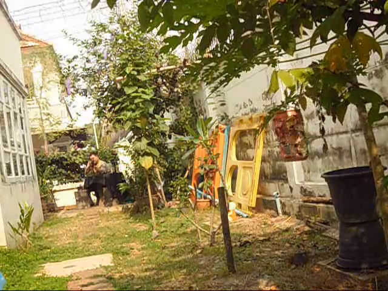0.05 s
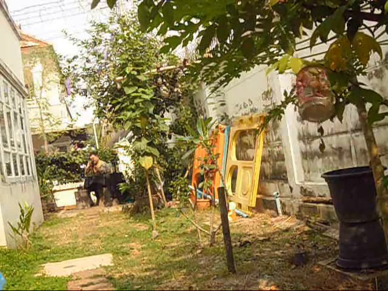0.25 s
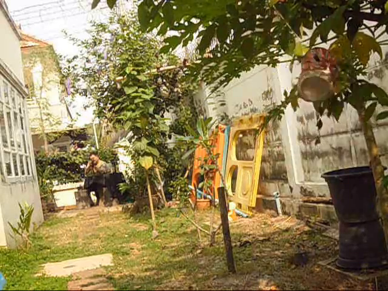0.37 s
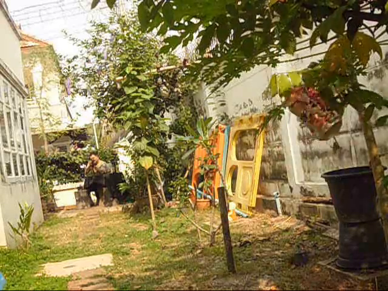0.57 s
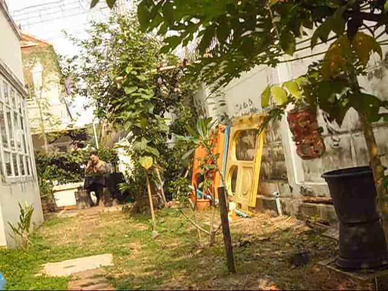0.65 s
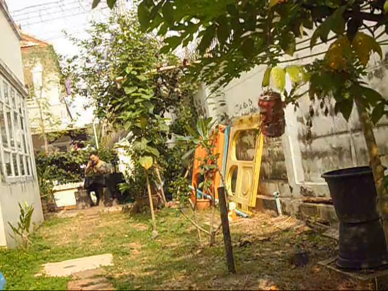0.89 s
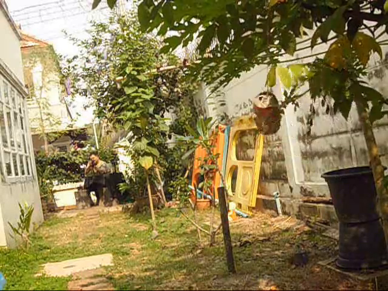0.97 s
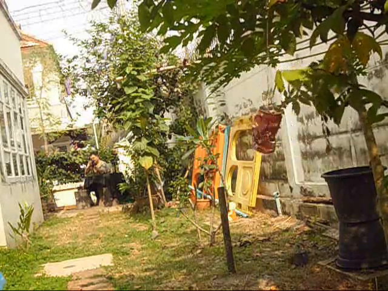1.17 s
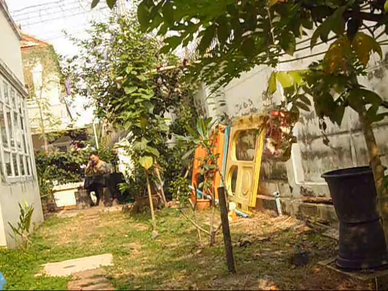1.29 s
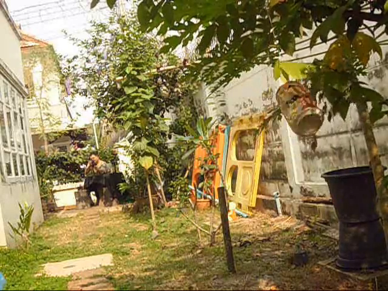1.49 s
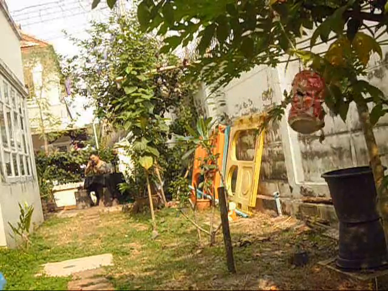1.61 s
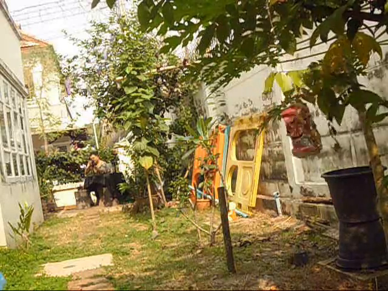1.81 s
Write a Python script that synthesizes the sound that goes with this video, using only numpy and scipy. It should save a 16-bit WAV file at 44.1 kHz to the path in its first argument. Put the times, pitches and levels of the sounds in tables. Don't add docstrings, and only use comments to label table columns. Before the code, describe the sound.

Loud tinny smack of a pellet on a hanging can after an airgun crack, then fading rattles.

```python
import sys
import numpy as np
from scipy import signal
from scipy.fft import rfft, irfft
from scipy.io import wavfile
from scipy.ndimage import uniform_filter1d

SR = 44100
rng = np.random.default_rng(int(sys.argv[2]) if len(sys.argv) > 2 else 0)


def voltage_ratio(decibels):
    exponent = np.asarray(decibels, float) / 20
    return 10 ** exponent


def persist_wave(psi):
    counts = np.round(np.clip(psi, -1, 1) * 32767).astype(np.int16)
    wavfile.write(sys.argv[1], SR, np.atleast_2d(counts).T)


N = 81585
SHOT_S, HIT_S = .2164, .262

# f/Hz, level/dB [dB per Hz]
CRUMPLE_SPECTRUM = [(35, -55), (60, -17.5), (1060, -6), (1190, -2), (1440, -9.5), (4410, 0.5), (7900, -8),
                    (12000, -8.5), (15900, -28)]
# f/Hz, level/dB [dB per Hz]
THUMP_SPECTRUM = [(15, -39), (25, 3), (258, 7.5), (788, 1), (1050, -1.5), (1200, -6.5), (1560, -18),
                  (2640, -120)]
# f/Hz, level/dB, t60/s
CAN_MODES = [(1560, -15, 0.37), (1606, -3, 0.23), (2234, -10.5, 0.4), (2950, -7, 0.23), (2900, -6, .2),
             (3190, -7.5, .2), (3725, 4.5, 0.75), (3680, -2.5, .2), (4130, -2, 0.3), (4310, -2.5, 0.099),
             (5290, -4.5, 0.076), (5390, -2.5, 0.12), (5900, -2.5, 0.22), (8800, -9, .2)]


def hit():
    t = np.arange(SR // 2) / SR
    hold_s, crumple_t60, snap_db = 0.016, 0.14, 1.4
    fall = voltage_ratio(-60 * np.maximum(t - hold_s, 0) / crumple_t60)
    flutter = evened(uniform_filter1d(rng.standard_normal(len(t)), size=60))
    snaps = evened(voltage_ratio(snap_db * flutter))
    crumple = voltage_ratio(-1.93) * noise(CRUMPLE_SPECTRUM, len(t)) * snaps * fall
    tones = voltage_ratio(-11.5) * ring(*np.transpose(CAN_MODES), size=len(t))
    push_db, push_s = -14, 0.0084
    phase = t / push_s
    push = voltage_ratio(push_db) * phase * (2 - phase) * np.exp(-phase)
    thump_db, thump_t60 = -10.5, .05
    thump = voltage_ratio(thump_db - 60 * t / thump_t60) * noise(THUMP_SPECTRUM, len(t))
    return crumple + tones + push + thump


def ring(hz, db, t60, size):
    longest_t60 = .3
    weights = voltage_ratio(db) / np.linalg.norm(voltage_ratio(db))
    return modes(hz, np.clip(t60, .01, longest_t60), size) @ weights


def modes(hz, t60, size):
    contact_s = 0.00029
    t = np.arange(size)[:, None] / SR
    sines = np.sin(2 * np.pi * (hz * t + rng.random(len(hz))))
    return voltage_ratio(-60 * t / t60) * sines * np.minimum(t / contact_s, 1)


# t/s, wall level/dB, rim
# level/dB, base level/dB, skid/s
KNOCKS = [(.323, -24, -26.5, -26, 0.008), (.345, -44, -19.5, -26, 0.008),
          (.375, -28, -25.5, -30, 0.0074), (.488, -33.5, -27.5, -40, 0.0061),
          (0.549, -36, -29, -31, 0.0016), (.5687, -30, -36, -40.5, 0.004), (.585, -48, -40, -51, 0.013),
          (0.605, -39.5, -39, -40, 0.0027), (.627, -62, -35, -45.5, 0.006),
          (.637, -43, -37.5, -44, 0.0011), (0.699, -50, -45.5, -59, 0.0012),
          (0.7662, -60, -50.5, -60, 0.0077),
          (0.7902, -50, -40.5, -47, 0.0045), (0.8084, -46, -37, -31.5, 0.0042),
                (0.8109, -58, -50, -38, 0.0012), (0.831, -63, -37.5, -45, 0.006),
                (0.8417, -55, -34, -38.5, 0.0052), (0.8649, -65, -29, -37, 0.003),
                (0.872, -46.5, -39.5, -47.5, 0.0025), (.878, -48, -32, -38.5, 0.0087),
                (0.9429, -56.5, -33.5, -32, 0.006), (.962, -56, -52, -54, 0.0022),
                (1.0496, -60, -49, -44, 0.0006), (1.0541, -59.5, -40.5, -44, 0.00044),
                (1.08, -46, -52, -50, 0.035), (1.2179, -60, -50.5, -64, 0.00075),
                (1.3028, -61, -45, -33, 0.00059), (1.308, -57, -51.5, -37, 0.002),
                (1.313, -60, -46.5, -42, 0.00067), (1.3236, -55, -45, -37.5, 0.0024),
                (1.355, -67, -56, -48, 0.0046), (1.338, -59, -44, -48, 0.005),
                (1.3925, -56, -45.5, -57, 0.013), (1.4421, -52, -41, -41.5, 0.0077),
                (1.4664, -49.5, -44.5, -37.5, 0.006), (1.478, -61, -43.5, -38, 0.0013),
                (1.4869, -65, -50, -43.5, 0.0011), (1.4934, -58, -50, -30.5, 0.0006),
                (1.4958, -61, -50, -33, .003), (1.516, -71, -58, -57, 0.0036),
                (1.752, -66.5, -64.5, -67, .003), (1.7869, -56, -47.5, -33, 0.0022),
                (1.824, -57, -52, -52, 0.014)]
# t/s, level/dB
ROLLING_LEVEL = [(.28, -25), (.36, -20.5), (.42, -20), (.48, -23.5), (.54, -33), (.64, -37.5), (0.679, -53),
                 (0.759, -54), (.82, -39.5), (.9, -37.5), (.995, -43), (1.02, -52), (1.12, -51.5),
                 (1.28, -60.5), (1.44, -45), (1.56, -60.5), (1.68, -70), (1.85, -46.5)]


def pellet():
    banks, out = can_banks(), np.zeros(N)
    for s, *levels_db, skid_s in KNOCKS:
        taps = skid(max(skid_s, .0005))
        response = sum(voltage_ratio(db) * strike(bank) for db, bank in zip(levels_db, banks))
        add(out, s, signal.fftconvolve(taps, response))
    out += rolling(banks)
    low_cut_hz = 390
    return signal.lfilter(*signal.butter(2, low_cut_hz, "high", fs=SR), out)


def rolling(banks):
    hits_per_s, spread_db, damp_s, trim_db = 600, 3, 0.045, -3
    roll = np.zeros(N)
    for spot in range(4):
        size = voltage_ratio(spread_db * np.minimum(rng.exponential(1, N), 4))
        size *= rng.random(N) < hits_per_s / SR
        body = sum(voltage_ratio(db) * strike(bank) for db, bank in zip((-2, 0.2, -2.5), banks))
        damped = body * np.exp(-np.arange(len(body)) / (damp_s * SR))
        roll += signal.oaconvolve(size, damped)[:N]
    s, db = np.transpose(ROLLING_LEVEL)
    return evened(roll) * voltage_ratio(trim_db + np.interp(np.arange(N) / SR, s, db, left=-120))


# f/Hz, level/dB, t60/s
WALL_MODES = [(1455, -9.5, .15), (1699, -0.5, 0.16), (2070, -7, 0.22), (2224, -0.5, 0.05), (1940, -3, 0.2),
              (2100, -6, 0.047), (2230, 1, 0.082), (2300, -10.5, 0.033)]
# f/Hz, level/dB, t60/s
RIM_MODES = [(780, -21.5, .3), (1039, -11, .2), (1130, -24.5, 0.11), (1525, -6.5, 0.077),
             (1950, -7.5, 0.068), (2340, -15.5, 0.033), (3130, -5, 0.083), (3730, 3.5, 0.11),
             (3890, -1, 0.078), (4016, -3.5, 0.11), (4290, -2, 0.15), (5280, -9, 0.3)]
# f/Hz, level/dB, t60/s
BASE_MODES = [(5600, -8.5, 0.066), (5596, -1, 0.087), (6100, -10, 0.14), (6170, -9.5, 0.17),
              (6650, -9, 0.13), (7480, -12.5, 0.038), (8730, -10, 0.043), (10100, -8, 0.066),
              (10690, -5.5, 0.079), (11900, -16, .1)]
# f/Hz, level/dB [dB per Hz]
WALL_CROWD = [(180, -59), (300, -29.5), (1150, -18.5), (1240, -14), (2040, -4), (4000, -9), (5200, -43),
              (8800, -120)]
# f/Hz, level/dB [dB per Hz]
RIM_CROWD = [(180, -51), (300, -12), (1270, -22), (1430, 1), (1660, -15), (4280, -2), (15900, -12.5)]
# f/Hz, level/dB [dB per Hz]
BASE_CROWD = [(590, -49.5), (1000, -12), (2870, -15), (3700, -6), (4560, -7.5), (5550, 0.5), (15900, -16.5)]
# f/Hz, t60/s
CROWD_T60 = [(500, 0.23), (2000, 0.29), (6000, 0.051), (14000, 0.18)]


def can_banks(count=320, size=6000):
    split, twin_db, longest_t60 = 0.0049, -7, 0.72
    pair = np.array([0, 1])
    banks = []
    for named, crowd, top_hz, crowd_db in [(WALL_MODES, WALL_CROWD, 3500, 1.4),
                                           (RIM_MODES, RIM_CROWD, 16000, 3.6),
                                           (BASE_MODES, BASE_CROWD, 18000, 0)]:
        hz, db, t60 = np.transpose(named + named)
        hz = hz * (1 + split * np.repeat(pair, len(named)))
        db = db + twin_db * np.repeat(pair, len(named))
        close_hz = 300 + (top_hz - 300) * (np.arange(count) + rng.random(count)) / count
        close = voltage_ratio(read(crowd, close_hz))
        close_t60 = read(CROWD_T60, close_hz) * rng.uniform(0.37, 1.05, count)
        all_t60 = np.r_[np.clip(t60, .01, longest_t60), np.maximum(close_t60, .01)]
        bank = modes(np.r_[hz, close_hz], all_t60, size)
        named_share = voltage_ratio(db) / np.linalg.norm(voltage_ratio(db))
        close_share = voltage_ratio(crowd_db) * close / np.linalg.norm(close)
        banks.append(bank * np.r_[named_share, close_share])
    return banks


def strike(bank):
    spot, tick_db, tick_s = 0.85, 6, 0.00099
    count = bank.shape[1]
    share = (1 + spot * rng.uniform(-1.3, 1, count)) * rng.choice([-1., 1.], count)
    tick = 1 + voltage_ratio(tick_db) * np.exp(-np.arange(len(bank)) / (tick_s * SR))
    return (bank @ share) * tick


def skid(skid_s, size=2048):
    taps_per_s, skid_db = 4200, -4
    t = np.arange(size) / SR
    taps = rng.standard_normal(size) * (rng.random(size) < taps_per_s / SR)
    taps *= voltage_ratio(skid_db) * np.exp(-t / skid_s) * np.sqrt(0.0049 / skid_s)
    taps[0] = min(0.0024 / skid_s, 1)
    z = rfft(taps)
    smooth_power = uniform_filter1d(abs(z) ** 2, size=size // 64)
    flat = irfft(z / np.sqrt(smooth_power), size)
    return flat[:size * 7 // 8]


# t/s, f/Hz, peak level/dB, t60/s
FAVOURED_MODES = [(.323, 1610, -24.5, 0.13), (0.342, 4310, -16, 0.05), (.374, 2234, -20.5, 0.2),
                  (0.4906, 1753, -25.5, 0.23), (0.493, 4080, -22, 0.063), (.492, 5070, -28.5, 0.092),
                  (.5488, 2066, -15.5, 0.043), (.5488, 2330, -18.5, 0.053), (.5687, 2060, -22, 0.065),
                  (0.568, 3630, -28.5, 0.067), (0.591, 1883, -30.5, 0.19), (.605, 3025, -34.5, 0.1),
                  (.627, 2030, -29, 0.056), (0.6374, 4080, -29.5, 0.027), (.6361, 5500, -35.5, 0.042),
                  (0.81, 6120, -34, 0.033), (.84, 3730, -35.5, 0.072), (.843, 4400, -32.5, 0.098),
                  (0.865, 4290, -32, 0.12), (.871, 1986, -35, 0.11), (0.869, 1455, -40, 0.27),
                  (.9434, 3680, -37.5, 0.12), (0.9423, 5400, -33.5, 0.073), (1.08, 1497, -44, 0.12),
                  (1.088, 2130, -54, .1), (1.17, 1990, -54, .25), (1.3021, 5490, -24.5, 0.035),
                  (1.3026, 6340, -36, 0.042), (1.3026, 10450, -36, 0.043), (1.324, 5530, -39, .05),
                  (1.324, 3706, -40, 0.054), (1.337, 5600, -42, 0.041), (1.355, 751, -60, 0.34),
                  (1.383, 1097, -56, .2), (1.394, 2273, -45, 0.29), (1.3933, 3600, -45, 0.13),
                  (1.442, 4124, -43.5, .2), (1.4433, 2460, -48, 0.1), (1.4692, 5900, -36, 0.034),
                  (1.478, 5760, -35, .04), (1.4927, 5650, -34, 0.029), (1.4936, 755, -54.5, .44),
                  (1.49, 958, -56.5, 0.22), (1.493, 1140, -53, 0.21), (1.4934, 1570, -48, 0.12),
                  (1.51, 1990, -60, .23), (1.7865, 5440, -44.5, .08)]


def pings():
    split, twin_db = 0.015, -5.5
    side = np.array([0, -1, 1])
    out = np.zeros(N)
    for s, hz, db, t60 in FAVOURED_MODES:
        trio_hz = hz * (1 + split * side * rng.uniform(0.89, 1, 3))
        trio_t60 = np.maximum(t60 * np.array([1, .7, .7]), .01)
        trio = modes(trio_hz, trio_t60, size=12000)
        add(out, s, trio @ voltage_ratio(db + twin_db * abs(side)))
    return out


def buzz(x):
    buzz_db = 1.2
    flutter = uniform_filter1d(uniform_filter1d(rng.standard_normal(N), size=30), size=30)
    return x * evened(voltage_ratio(buzz_db * evened(flutter)))


# f/Hz, level/dB [dB per Hz]
SHOT_SPECTRUM = [(35, -37), (60, 0.5), (713, -10.5), (1650, -5), (2350, -8), (3180, 2.5), (7710, -11),
                 (12300, -9), (15900, -18.5)]


def shot():
    shot_db, crack_db, crack_s, rise_s, t60 = -16, 5, .0006, 0.002, 0.54
    t = np.arange(SR // 2) / SR
    crack = voltage_ratio(crack_db) * np.exp(-t / crack_s)
    clatter = np.minimum(t / rise_s, 1) * voltage_ratio(-60 * t / t60)
    return voltage_ratio(shot_db) * noise(SHOT_SPECTRUM, len(t)) * (crack + clatter)


# f/Hz, peak level/dB, t60/s
STOCK_MODES = [(378, -31.5, .08), (750, -34, .08)]


def stock():
    hz, db, t60 = np.transpose(STOCK_MODES)
    return modes(hz, np.maximum(t60, .01), size=SR // 2) @ voltage_ratio(db)


LEAD_IN_S = .12


def lead_in():
    t = np.arange(round((SHOT_S - LEAD_IN_S) * SR)) / SR
    return voltage_ratio(-65.5) * noise(RIM_CROWD, len(t)) * np.sqrt(t / t[-1])


# f/Hz, t60/s
GARDEN_T60 = [(300, 0.046), (2000, 0.46), (6000, 0.37), (14000, 0.37)]


def garden(x):
    hz, t, z = signal.stft(rng.standard_normal(SR), SR, nperseg=256)
    t60 = np.maximum(read(GARDEN_T60, hz), .05)[:, None]
    tail = signal.istft(z * voltage_ratio(-60 * t / t60), SR, nperseg=256)[1]
    tail = np.r_[np.zeros(300), tail]
    return signal.fftconvolve(x, tail / np.linalg.norm(tail))[:N]


# f/Hz, level/dB [dB per Hz]
AIR_SPECTRUM = [(12, -44), (20, 4), (101, -11), (221, -20.5), (269, -19.5), (497, -29.5), (800, -27),
                (1320, -30), (15900, -50)]


def air():
    air_db, gust_db = -53, .8
    drift = uniform_filter1d(uniform_filter1d(rng.standard_normal(N), size=3000), size=3000)
    return voltage_ratio(air_db) * evened(noise(AIR_SPECTRUM, N) * voltage_ratio(gust_db * evened(drift)))


def noise(spectrum, size):
    gain = voltage_ratio(read(spectrum, np.fft.rfftfreq(size, 1 / SR)))
    return evened(irfft(rfft(rng.standard_normal(size)) * gain, size))


def read(points, hz):
    f, value = np.transpose(points)
    return np.interp(np.log(hz + 1), np.log(f + 1), value)


def evened(x):
    return x / np.sqrt(np.mean(x ** 2) + 1e-20)


def add(mix, s, sound):
    part = mix[round(s * SR):][:len(sound)]
    part += sound[:len(part)]


def scene():
    can, gun = pellet() + pings(), np.zeros(N)
    add(can, HIT_S, hit())
    add(gun, SHOT_S, shot())
    add(gun, SHOT_S, stock())
    add(gun, LEAD_IN_S, lead_in())
    yard = voltage_ratio(-11.5) * garden(can)
    return (gun + buzz(can) + yard + air())[None]


def roll_off(x):
    return signal.sosfilt(signal.butter(12, 16060, fs=SR, output="sos"), x)


def record(dry):
    top_hz, clip, coupling_hz = 16150, .965, 18
    heard = signal.sosfilt(signal.cheby2(12, 40, top_hz, fs=SR, output="sos"), dry)
    clipped = np.clip(heard, -clip, clip)
    coupled = signal.lfilter(*signal.butter(1, coupling_hz, "high", fs=SR), clipped)
    return roll_off(coupled)


dry = scene()
out = record(dry)
persist_wave(out)
```